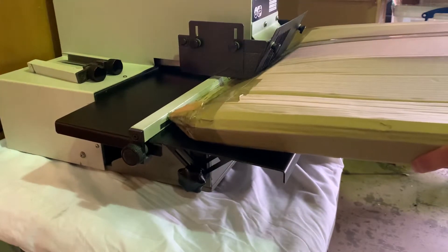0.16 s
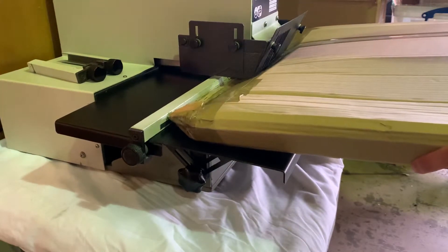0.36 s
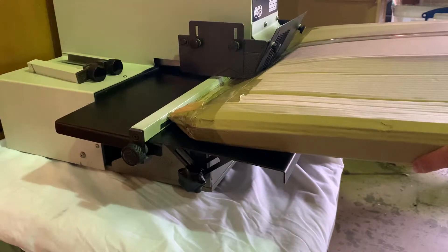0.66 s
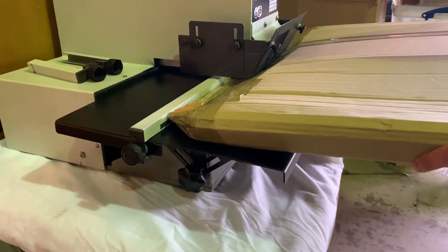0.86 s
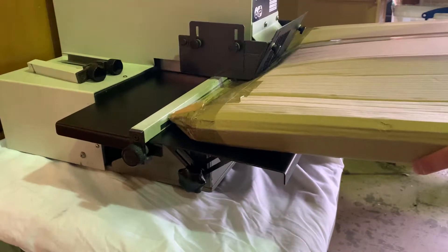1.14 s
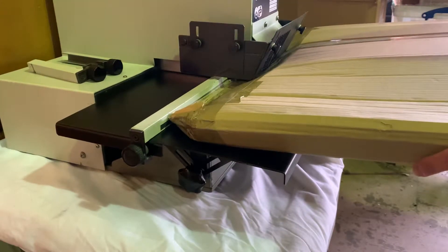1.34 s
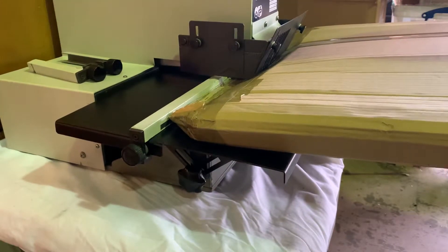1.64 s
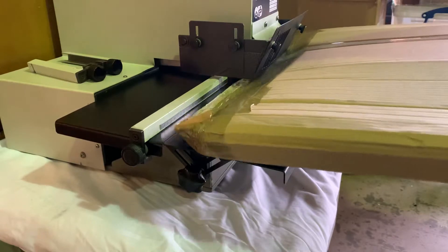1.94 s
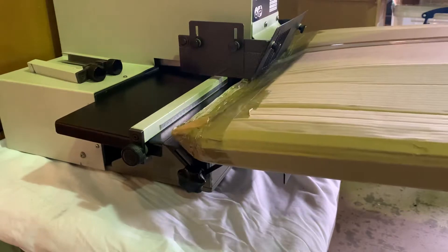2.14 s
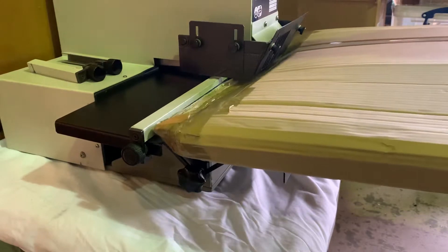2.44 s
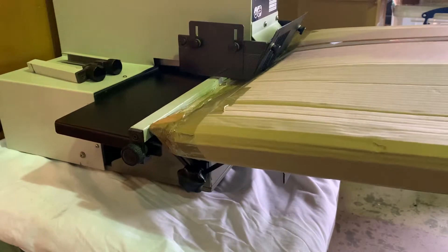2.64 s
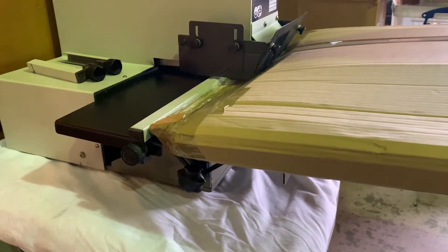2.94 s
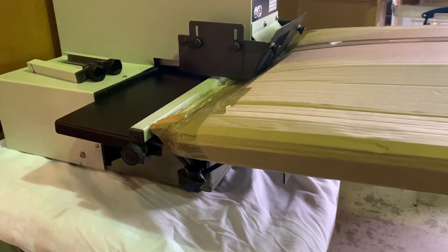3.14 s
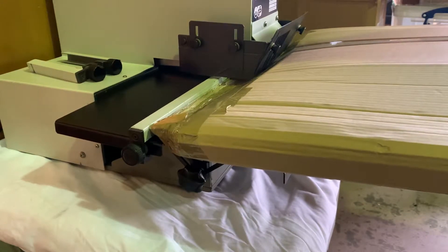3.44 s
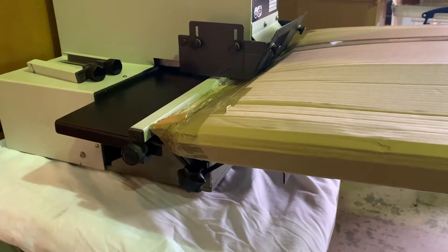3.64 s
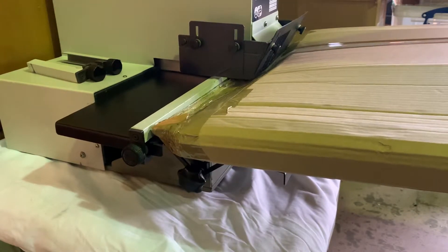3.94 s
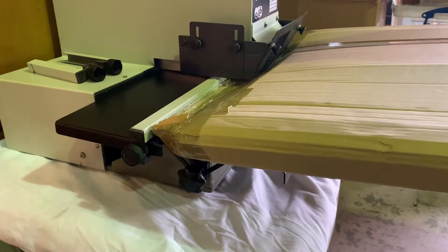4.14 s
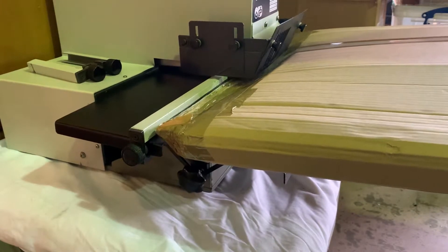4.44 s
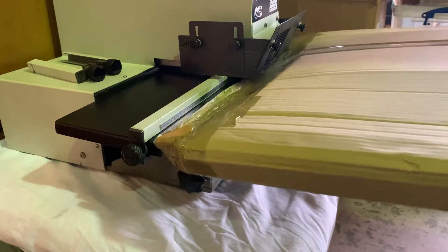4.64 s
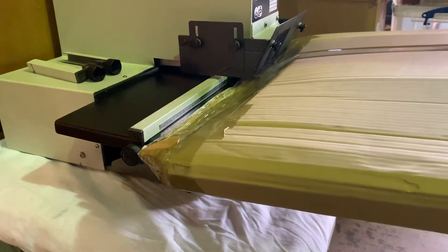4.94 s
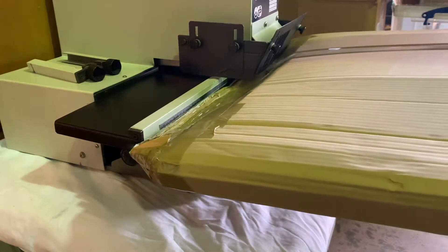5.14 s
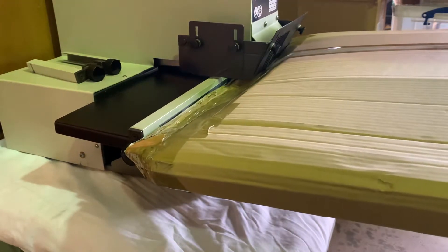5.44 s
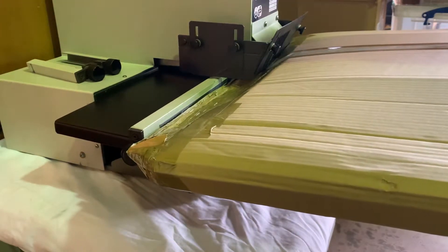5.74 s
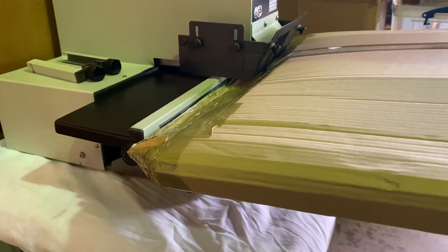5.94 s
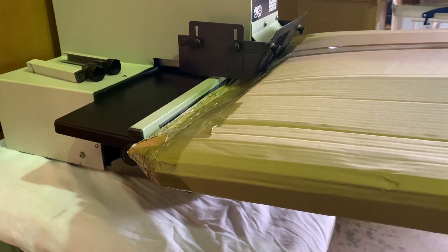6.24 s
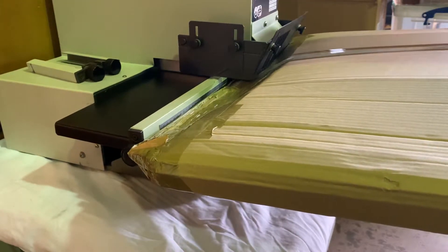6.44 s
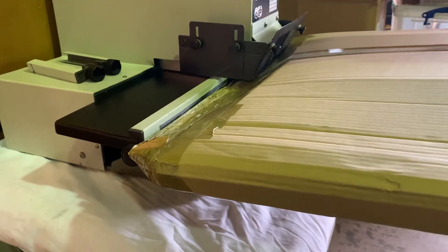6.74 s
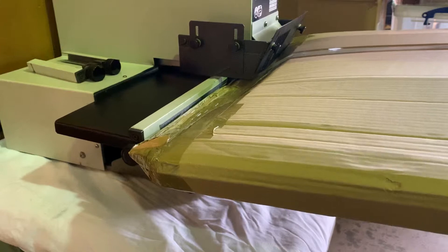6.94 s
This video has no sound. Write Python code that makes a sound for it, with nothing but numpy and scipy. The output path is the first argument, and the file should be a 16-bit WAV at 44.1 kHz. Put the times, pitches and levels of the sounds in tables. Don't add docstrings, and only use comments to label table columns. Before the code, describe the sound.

Close to a stapling machine in a small workshop, a latch clacks with a tiny squeak, then a rapid run of rattling steel blows and hollow thumps lasts under a second. Three such cycles occur about three seconds apart. Between them a wrapped carton scrapes, knocks and ticks over low drone and floor rumble, with a short dull room tail.

```python
import sys
import numpy as np
from scipy import signal
from scipy.fft import rfft, irfft, next_fast_len
from scipy.io import wavfile

SR = 44100
rng = np.random.default_rng(int(sys.argv[2]) if len(sys.argv) > 2 else 0)


def decibels_to_gain(level_db):
    exponent = np.asarray(level_db, float) / 20
    return 10 ** exponent


def file_out(sig):
    cols = np.atleast_2d(sig).T
    lim = np.clip(cols, -1, 1)
    pcm = np.round(lim * 32767).astype(np.int16)
    wavfile.write(sys.argv[1], SR, pcm)


N = 312228

# [hz, width_hz, level_db]
CABINET_MODES = [(172.8, 25, 3.5), (186.8, 13, 5.5), (215.9, 17, 3.5), (289, 23, -5), (328, 11, 0),
                 (351, 68, -6), (425.8, 5.1, -4.5)]
# [start_s, force_db, thump_db, hardness_db, spread (of the run, re usual)]
STAGE_STROKES = [(.766, 1.3, 3, -4, 0.95), (0.846, 1.5, -2, 2.5, 1), (0.9278, 2, -1, -0.5, .99),
                 (1.107, -1.5, 1.5, -0.9, .95), (1.344, -3.5, 3, 6, 0.84), (1.392, 0.5, 2.5, -3, 1.05),
                 (3.541, 0.5, 4, -2.5, 1), (3.624, -3, 2, 8.5, 1), (3.705, 1.5, -4, 0.5, .97),
                 (3.881, -3, 1.5, -0.5, 1.02), (4.122, -4, 5, 8.5, 1.05), (4.17, -1.5, 2.5, -0.5, .9),
                 (6.133, -0.5, -2, -5, 1.1), (6.228, 12, -7, -7.5, 1), (6.305, 1, -1, -1, 1.05),
                 (6.482, -1.64, 3, -1.4, 1.1), (6.725, -5, 7, 10, 1), (6.769, -1, 4.5, -0.5, 1)]
STAGES = 6


def rms_one(x):
    return x / np.sqrt(np.mean(x ** 2) + 1e-20)


def in_time(rows):
    s, *columns = np.transpose(rows)
    return [np.interp(np.arange(N) / SR, s, column) for column in columns]


def grid_hz():
    return np.fft.rfftfreq(2 * next_fast_len((N + SR // 2) // 2), 1 / SR)


def filtered(x, response):
    gain = np.sqrt(np.mean(np.abs(response) ** 2))
    return irfft(rfft(x, 2 * response.shape[-1] - 2) * response / gain)[..., :N]


def modes(table, size=None):
    f = grid_hz() if size is None else np.fft.rfftfreq(size, 1 / SR)
    total = 0
    for k, (hz, width, db) in enumerate(table):
        damping = 1j * f * width
        total = total + (-1) ** k * decibels_to_gain(db) * damping / (hz ** 2 - f ** 2 + damping)
    return total


def colour(spectrum):
    hz, db = np.transpose(spectrum)
    cepstrum = irfft(np.log(decibels_to_gain(np.interp(np.log(grid_hz() + 1), np.log(hz), db))))
    half = len(cepstrum) // 2
    cepstrum[1:half] *= 2
    cepstrum[half + 1:] = 0
    return np.exp(rfft(cepstrum))


def bursts(times, levels_db, decays_s, rise_s, size=N):
    t = np.arange(SR // 5) / SR
    power = np.zeros(size + len(t))
    for s, db, decay, rise in np.broadcast(times, levels_db, decays_s, rise_s):
        at = round(s * SR)
        shape = (1 - np.exp(-t / rise)) * np.exp(-t / max(decay, 2e-4))
        power[at:at + len(t)] += (decibels_to_gain(db) * shape) ** 2
    return np.sqrt(power[:size])


def grains(per_s, spread_db):
    born = rng.random(N) < per_s / SR
    sizes = decibels_to_gain(spread_db * np.minimum(rng.exponential(1, N), 4))
    return rms_one(born * sizes * rng.choice([-1, 1], N))


def drift(rate):
    knots = rng.standard_normal(400)
    return np.interp(np.arange(N) / SR * rate, np.arange(400), knots)


def slowly(shape):
    at = np.arange(0, N + 64, 64)
    return np.interp(np.arange(N), at, shape(at[:, None] / SR))


def swells(times, levels_db, rise_s, decay_s):
    def shape(t):
        age = np.maximum(t - times, 0)
        level = decibels_to_gain(levels_db) * (1 - np.exp(-age / rise_s)) * np.exp(-age / decay_s)
        return np.sum(level ** 2, axis=1)
    return slowly(shape)


def holds(starts, ends, levels_db, rise, fall):
    def shape(t):
        before, after = np.maximum(starts - t, 0), np.maximum(t - ends, 0)
        return np.sum(decibels_to_gain(levels_db - rise * before - fall * after) ** 2, axis=1)
    return slowly(shape)


def contacts():
    # [delay_s, head_db, thump_db (cabinet re head), hard_db (hard parts re head), decay_s]
    latch_run = [(-.027, -42, -2, 1, .025), (-.009, -34, -10, 6, .01), (0, -17, -22, 1, .009),
                 (.021, -16.5, -13, -9, .008)]
    take_up_run = [(0, -32, 8.8, -8.5, 0.011)]
    feed_run = [(-.016, -22.5, -4, -8.5, 0.0083), (0, -17.5, 0, 0.5, 0.0071), (.04, -22, 3.5, -16, 0.013),
                (0.056, -17.5, 0.5, -13, .013), (0.105, -39.5, 14, -15, 0.019)]
    blow_run = [(0, -8.5, 0, 1, 0.011), (.021, -6, -2.5, -3.5, 0.0098), (0.041, -15, -5, -17.5, .024),
                (.066, -25.5, 11, -13.5, 0.0087)]
    clinch_run = [(0, -6.5, 3, -24, 0.0051), (.0095, -15, -21.5, -14.5, 0.023)]
    return_run = [(0, -3, -5.5, -4, 0.009), (.016, -13, -17, -10, 0.016), (0.032, -12, -9, -5, .014),
                  (.062, -16, 3, -22.5, 0.0074)]
    blade_db = [5, -4, -0.5, 0, 0, 0.5]
    # [start_s, head_db, thump_db, hard_db, decay_s]
    strays = [(0.959, -20.5, -7, 0, 0.011), (1.072, -33, 9, -3.5, 0.016), (1.085, -22.5, 7.5, -1.5, 0.0082),
              (4.147, -25, -10, 1.5, 0.0067), (1.358, -25, -10.5, 2, 0.0044), (1.428, -21.5, -10, 5, 0.01),
              (6.338, -22, 3, -17, 0.017), (6.852, -15.5, -10, -35, 0.0058)]
    runs = [latch_run, take_up_run, feed_run, blow_run, clinch_run, return_run]
    rows = [(s, db, thump_db, hard_db, hard_db, decay) for s, db, thump_db, hard_db, decay in strays]
    for k, (s, force_db, push_db, edge_db, spread) in enumerate(STAGE_STROKES):
        stage = k % STAGES
        for delay, db, thump_db, hard_db, decay in runs[stage]:
            bright_db = hard_db + edge_db
            rows.append((s + spread * delay, db + force_db, thump_db + push_db,
                         bright_db + blade_db[stage], bright_db, decay))
    return np.transpose(rows)


def shaking():
    # [time_s, rumble_db (floor), drone_db (motor in the cabinet)]
    rest_curve = [(0, -45, -54.5), (.31, -49, -53), (.71, -48, -56), (2.1, -47, -51), (2.5, -47, -48),
                  (2.72, -48.5, -49), (2.78, -57.5, -50), (3.0, -48, -50.5), (3.39, -45, -56),
                  (4.47, -57, -44), (4.67, -56, -39.5), (4.81, -48, -41), (5.17, -48, -49.5),
                  (5.5, -46, -59.5), (5.84, -45, -58.5), (6.09, -38.5, -64.5), (7.08, -49, -47)]
    # [start_s, sway_db, boom_db, low_panel_db, upper_panel_db]
    jolt_table = [(.85, -44, -45, -30.5, -23.5), (0.933, -24, -22.5, -19, -17),
                  (1.109, -24, -38, -24.5, -17), (1.345, -56, -27, -22.5, -30),
                  (1.40, -23.5, -36, -38, -20.5), (2.31, -48, -41, -52, -44),
                  (3.438, -29.5, -70.5, -67.5, -62), (3.63, -41, -34, -31, -51),
                  (3.701, -24, -24, -21.5, -20), (3.879, -30, -35, -25, -30),
                  (4.125, -31, -24.5, -24.5, -32), (4.18, -22, -39, -39, -20), (5.859, -35, -72, -54, -66),
                  (6.161, -50, -30.5, -53, -28), (6.271, -19, -33, -23.5, -20),
                  (6.49, -34, -28.5, -31.5, -35), (6.73, -23, -40, -23, -40), (6.78, -47, -22.5, -31, -26)]
    # [rise_s, decay_s, after_ring_db, after_ring_decay_s]
    answers = [(0.06, 0.11, -11.5, 0.29), (0.029, 0.12, -22, 0.18), (0.0031, 0.12, -3, 0.33),
               (0.027, 0.1, -18.5, 0.4)]
    rumble_db, drone_db = in_time(rest_curve)
    s, *jolts = np.transpose(jolt_table)
    rests = [rumble_db, rumble_db - 13.5, rumble_db - 20.5, drone_db]
    levels = []
    for rest, db, (rise, decay, late_db, late) in zip(rests, jolts, answers):
        fast = swells(s, db, rise, decay)
        slow = swells(s, db + late_db, rise, late)
        levels.append(10 * np.log10(decibels_to_gain(rest) ** 2 + fast + slow))
    return levels


def hissing():
    hiss_rest_db = [-65, -92, -90.5]
    # [start_s, length_s, rub_db, film_db (re rub), air_db (re rub)]
    slides = [(-.05, 0.091, -66, -0.5, 5.5), (1.613, 0.31, -52, 4.5, -1.5), (1.708, 0.043, -67, 26, -14.5),
              (1.955, 0.036, -56.5, -7, 5), (2.248, 0.15, -60, -0.5, 6.5), (2.451, 0.11, -64.5, -1, 9),
              (2.792, 0.062, -67.5, -5.5, 4), (3.037, 0.071, -75.5, 0.5, 8), (4.376, 0.087, -58, -2, 1),
              (4.553, 0.13, -55, -1.5, -7.5), (4.67, 0.11, -58.5, 1.5, 4), (4.851, 0.21, -67.5, 1, 7.5),
              (5.126, 0.1, -62.5, -1, 6.5), (5.263, 0.04, -76.5, 2, 6), (5.894, 0.016, -74.5, -3, -7.5),
              (7.036, .1, -53, 5, 1)]
    drive_db, drive_fall = [-41.5, -52.5, -55.5], [34, 35, 110]
    drive_rise, overrun_s = 700, 0.12
    cycles = np.array(STAGE_STROKES)[:, 0].reshape(-1, STAGES)
    start, length, db, film_db, air_db = np.transpose(slides)
    s, head_db = contacts()[:2]
    drag = swells(s, head_db - 35, rise_s=0.035, decay_s=0.089)
    levels = []
    for rest, rel_db, drive, fall, extra in zip(hiss_rest_db, [air_db, 0, film_db], drive_db, drive_fall,
                                                [0, drag, 0]):
        sliding = holds(start, start + length, db + rel_db, rise=220, fall=230)
        running = holds(cycles[:, 0], cycles[:, -1] + overrun_s, drive, drive_rise, fall)
        levels.append(10 * np.log10(decibels_to_gain(rest) ** 2 + extra + sliding + running))
    return levels


def patchy(x):
    edges_hz = [1000, 2400, 3600, 5200, 7500, 11000, 17000]
    total = 0
    for k, edges in enumerate(zip(edges_hz, edges_hz[1:])):
        band = signal.butter(2, edges, "band", fs=SR, output="sos")
        flicker = decibels_to_gain(2.5 * drift(14))
        total = total + (-1) ** k * flicker * signal.sosfilt(band, x)
    return total


def background():
    # [hz, width_hz, level_db]
    stand = [(46.8, 9.1, -2.5), (69, 17, -4), (76.2, 7.7, -2), (130, 38, -19.5)]
    # [hz, width_hz, level_db]
    hum = [(772, 8, -73)]
    # [hz, width_hz, steady_db]
    panel_modes = [(93.5, 12, -2), (180, 17, 1)]
    # [hz, level_db (per Hz)]
    air_spectrum = [(240, -15.5), (400, -5.5), (791, -9), (992, -10.5), (1070, -11.5), (2600, -27.5),
                    (3380, -68), (5720, -120)]
    rub_spectrum = [(1200, -13.5), (2000, 2.5), (3000, -5), (3750, 0.5), (4500, 0), (6200, -20),
                    (8000, -34.5)]
    film_spectrum = [(4800, -27.5), (6200, -1.5), (10200, 3.5), (13500, 0), (15500, 2.5), (16300, -30)]
    # [hz, width_hz, level_db]
    flutes = [(2250, 170, -4), (3825, 350, 8.5)]
    sway_db, boom_db, *panels_db = shaking()
    air_db, rub_db, film_db = hissing()
    white, t = rng.standard_normal((8, N)), np.arange(N) / SR
    low = decibels_to_gain(sway_db) * filtered(white[0], modes(stand))
    low += decibels_to_gain(boom_db + 0.68 * drift(2.6)) * filtered(white[1], modes(CABINET_MODES[2:]))
    for hz, width, db in hum:
        low += decibels_to_gain(db) * filtered(white[2], modes([(hz, width, 0)]))
    for db, (hz, width, steady_db) in zip(panels_db, panel_modes):
        wander = np.cumsum(2.68 * drift(5.7)) / SR
        steady = decibels_to_gain(steady_db) * np.sin(2 * np.pi * (hz * t + wander))
        low += decibels_to_gain(db) * (steady + 0.5 * filtered(white[7], modes([(hz, width, 0)])))
    apart = np.array([[1], [-1]])
    air_noise = filtered(white[3] + 0.46 * apart * white[4], colour(air_spectrum))
    air = decibels_to_gain(air_db + 0.88 * drift(8.9)) * air_noise
    friction = 0.3 * white[5] + 0.5 * grains(1500, spread_db=1.5) + 0.87 * apart * white[6]
    board = 0.96 * filtered(friction, colour(rub_spectrum)) + 0.36 * filtered(friction, modes(flutes))
    rub = decibels_to_gain(rub_db + 3.0 + 1.8 * drift(20)) * board
    film = decibels_to_gain(film_db + 5.5 + 2.1 * drift(21)) * filtered(friction, colour(film_spectrum))
    wide_low = low * decibels_to_gain([[-.8], [.8]]) + decibels_to_gain(-19.5) * apart * np.roll(low, 900)
    return wide_low + air + patchy(rub + film)


def film_ticks():
    # [start_s, level_db, centre_hz]
    tick_table = [(.53, -59.5, 2950), (2.0017, -31.5, 9500), (2.3059, -29, 10430), (2.309, -24.5, 10100),
                  (2.317, -32, 9000), (2.388, -35.5, 10500), (2.396, -40, 9000), (2.457, -38, 7900),
                  (2.4635, -33.5, 9780), (2.7842, -19, 12510), (2.8281, -36, 6500), (2.8467, -15.5, 11800),
                  (2.9507, -57, 3990), (4.868, -40.5, 6330), (4.9846, -48, 3850), (5.016, -39.5, 6340),
                  (5.18, -29, 10400), (5.1966, -41.5, 3600), (5.238, -32, 10650), (5.448, -57, 5030),
                  (2.482, -47, 8500), (5.481, -59, 3200), (5.6755, -54, 4470), (5.521, -47, 4900),
                  (5.6361, -44, 10060), (5.6808, -51, 6260), (5.833, -46, 13500), (5.878, -29.5, 10900)]
    white, span = rng.standard_normal(N), SR // 8
    ticks = np.zeros(N)
    for s, db, hz in tick_table:
        at = slice(round(s * SR), round(s * SR) + span)
        snap = white[at] * bursts([0], db - 26, 0.00786, rise_s=0.0023, size=span)
        snap[0] = decibels_to_gain(db + 14.5) * np.sign(white[at][0])
        peak = signal.iirpeak(min(hz, 15000), 1.5, SR)
        rung = signal.lfilter(*peak, snap) + decibels_to_gain(-20.5) * snap
        ticks[at] += np.sqrt(14000 / hz) * signal.lfilter(*peak, rung)
    return ticks


def clutch_latch():
    # [start_s, level_db]
    latches = [
        (0.765, -7),
        (3.539, -10.5),
        (6.131, -14),
    ]
    # [hz, width_hz, level_db]
    latch_modes = [(550, 70, 1), (1480, 130, -24), (2150, 90, -14.5), (2660, 120, -8), (3320, 370, -8),
                   (4050, 230, -7.5)]
    s, db = np.transpose(latches)
    force = rng.standard_normal(N) * bursts(s, db, 0.0013, rise_s=0.0007)
    return filtered(force, modes(latch_modes))


def clutch_squeak():
    # [centre_s, level_db, spread_s]
    squeaks = [
        (0.82, -17, 0.011),
        (3.573, -16.5, 0.0059),
        (6.157, -15, 0.0053),
        (6.146, -16, 0.00173),
    ]
    t = np.arange(N) / SR
    swell = sum(decibels_to_gain(db) * np.exp(-((t - s) / spread) ** 2 / 2) for s, db, spread in squeaks)
    phase = 2 * np.pi * 1043 * t + 0.39 * drift(33)
    early_swell = np.roll(swell, -round(.006 * SR))
    return swell * np.sin(phase) + decibels_to_gain(-10.5) * early_swell * np.sin(1.9 * phase)


def sheets(s, levels_db, decays_s, rise_s):
    # [hz, level_db (per Hz)]
    rattle_spectrum = [(2240, -20), (3800, -3), (5270, -11.5), (6210, -5.5), (10500, -2.5), (12000, -11),
                       (15400, -9.5), (16800, -29)]
    sheet_count, ring_s, direct = 2, .008, .6
    t, tone = np.arange(SR // 20) / SR, colour(rattle_spectrum)
    out, total = 0, 0
    grit, which = grains(6500, spread_db=6.5), np.arange(len(s)) % sheet_count
    for k in range(sheet_count):
        own = which == k
        ring = rng.standard_normal(len(t)) * np.exp(-t / ring_s)
        crowd = rfft(ring / np.sqrt(np.sum(ring ** 2)), 2 * len(tone) - 2)
        force = grit * bursts(s[own], levels_db[own], decays_s[own], rise_s[own])
        out = out + filtered(force, tone * (direct + crowd))
        total = total + force
    return out, total


def mechanism():
    # [hz, width_hz, level_db]
    head_modes = [(488, 63, 3), (610, 48, 3.5), (768, 52, 1), (860, 22, -4.5), (1064, 110, 1.5),
                  (1144.4, 38, 1)]
    table_modes = [(268, 5, -2), (358, 5, 0), (518, 4, 0), (578, 5, -3)]
    driver_modes = [(1370, 11, -14.5), (1920, 37, -1.5), (2130, 38, 4), (2640, 36, -6.5), (3066, 330, 6),
                    (3740, 280, -1)]
    pin_modes = [(4540, 31, 6), (5740, 70, -1), (6394, 30, 11), (7380, 60, -1)]
    # [hz, level_db (per Hz)]
    clatter = [(240, -42), (400, -4), (695, -6.5), (1050, 10.5), (1500, -9.5), (1950, -64), (3300, -120)]
    scratch = [(820, -30), (1400, -6.5), (2260, -1.5), (2460, -5), (4200, -22), (5460, -32), (9240, -120)]
    s, head_db, thump_db, driver_db, bright_db, decay = contacts()
    slow = decibels_to_gain(-.45 * (head_db + 9.5))
    chatter = 0.88 * grains(1600, spread_db=5.5) + 0.64 * rng.standard_normal(N)
    first = bursts(s, head_db - 0.5, 0.0025, 0.0016 * slow)
    force = chatter * (first + bursts(s, head_db, decay, 0.0032 * slow))
    head = decibels_to_gain(-2.0) * filtered(force, modes(head_modes)) + decibels_to_gain(-5.5) * filtered(force, colour(clatter))
    table = decibels_to_gain(-13.5) * filtered(force, modes(table_modes))
    force = chatter * bursts(s, head_db + driver_db - 4.5, 1.04 * decay, 0.0029 * slow)
    driver = decibels_to_gain(-1.0) * filtered(force, modes(driver_modes)) + decibels_to_gain(3) * filtered(force, colour(scratch))
    rattle, force = sheets(s, head_db + bright_db - 1.5, 1.07 * decay, 0.00041 * slow)
    pins = decibels_to_gain(-13) * filtered(force, modes(pin_modes))
    force = rng.standard_normal(N) * bursts(s, head_db + thump_db + 2.5, 1.37 * decay, 0.0063)
    return head + table + driver + rattle + pins + filtered(force, modes(CABINET_MODES))


def impacts():
    # [hz, width_hz, level_db]
    latch_ring = [(517, 76, -5.5), (1490, 77, -13.5), (2200, 72, -14.5), (2770, 470, -3), (3220, 80, -14),
                  (3610, 65, -12.5), (4040, 210, -0.5), (6600, 200, -15)]
    feed_ring = [(2180, 45, -4.5), (3600, 60, -5.5), (4560, 50, -7), (5300, 38, -11), (5900, 100, -0.5),
                 (7440, 40, -3), (7500, 60, -6), (9790, 80, -11), (10400, 60, -14)]
    blow_ring = [(326, 80, 5), (540, 110, 2.5), (1050, 230, -1), (1860, 50, -1), (2305, 120, -2),
                 (3063, 60, -5), (4535, 40, -11), (6870, 100, -10.5), (7550, 60, -10.5), (9380, 100, -9.5)]
    clinch_ring = [(352, 100, -5.5), (776, 70, 3), (1120, 86, -1), (2100, 99, -12), (3800, 90, -20.5)]
    return_ring = [(215, 30, 5), (500, 49, -0.5), (1048, 30, -2), (1890, 65, -4.5), (2210, 60, -6),
                   (3210, 77, -4.5), (4300, 40, -2), (6460, 20, -10), (7300, 40, -13), (10500, 80, -12.5)]
    # [stage (0 latch .. 5 return), delay_s, level_db, contact_s]
    blows = [(0, -.0005, 2, 0.00018), (0, .0015, 2.5, 0.00009), (2, 0.006, -4, 0.000038),
             (2, .0035, -12, 0.00007), (2, 0.064, -5, 0.00016), (3, .001, -2.5, 0.000043),
             (3, .006, -2.5, 0.000085), (3, 0.017, -2.5, 0.000074), (3, .0235, 1.5, 0.0005),
             (3, .038, 10, 0.00082), (4, .001, 1.5, 0.00025), (4, .012, 3, 0.00017), (4, 0.021, -7, .0001),
             (5, .002, 0, 0.000054), (5, .0065, 8, 0.00011), (5, .016, 3.5, 0.00048),
             (5, .036, 1.5, 0.00021)]
    rings = [latch_ring, None, feed_ring, blow_ring, clinch_ring, return_ring]
    out, t = np.zeros(N + SR), np.arange(8192) / SR
    for stage, delay, db, contact in blows:
        stage = round(stage)
        push = t * np.exp(-t / max(contact, 2e-5))
        push = push / np.sqrt(np.sum(push ** 2))
        response = modes(rings[stage], size=len(t))
        blow = irfft(rfft(push) * response / np.sqrt(np.mean(np.abs(response) ** 2)))
        for s, force_db, _, _, spread in STAGE_STROKES[stage::STAGES]:
            at = round((s + spread * delay) * SR)
            out[at:at + len(t)] += decibels_to_gain(db + force_db) * blow
    return out[:N]


def carton_knocks():
    # [start_s, body_db, slap_db (re body), slap_hz, decay_s]
    knock_table = [(2.305, -24, -16, 790, 0.031), (2.316, -30, -14.5, 816, 0.0086),
                   (2.653, -38, -24, 577, 0.008), (5.125, -49, 16.5, 1900, 0.0032),
                   (5.186, -30, -16, 567, 0.014), (5.519, -39, 7, 1270, 0.0038),
                   (5.681, -49, 1, 786, 0.0058), (5.875, -52, -4.5, 584, 0.013),
                   (1.826, -29.5, 1.5, 1030, 0.016),
        (5.398, -38, -10, 597, 0.011),
    ]
    # [hz, width_hz, level_db]
    box_modes = [(190.4, 14.7, 3.5), (290, 48, -0.5), (321.6, 8.5, -1), (380, 61, -6.5), (467, 240, -9)]
    white, span = rng.standard_normal((2, N)), SR // 8
    knocks = np.array(knock_table)
    force = white[0] * bursts(knocks[:, 0], knocks[:, 1] + 0.61, knocks[:, 4], rise_s=0.0014)
    out = filtered(force, modes(box_modes))
    for s, db, slap_db, hz, decay in knocks:
        at = slice(round(s * SR), round(s * SR) + span)
        slap = white[1, at] * bursts([0], db + slap_db, 0.5 * decay, rise_s=0.00027, size=span)
        dull = signal.lfilter([.1], [1, -1.4, .49], slap)
        out[at] += np.sqrt(SR / hz / 1.5) * signal.lfilter(*signal.iirpeak(hz, 1.3, SR), dull)
    return signal.lfilter(*signal.butter(2, 2600, fs=SR), out)


def nearby(x):
    span_s, from_hz = .011, 1500
    lags = (rng.uniform(0.05, 1, size=14) * span_s * SR).astype(int) + 1
    high = signal.lfilter(*signal.butter(2, from_hz, "high", fs=SR), x)
    echoes = decibels_to_gain(-12) * sum((-1) ** k * np.roll(high, lag) for k, lag in enumerate(lags))
    return np.array([x + echoes, x - echoes])


def workshop(x):
    t60_s, cut_hz = 0.32, 5500
    t = np.arange(SR) / SR
    common, own = rng.standard_normal(SR), rng.standard_normal((2, SR))
    own = signal.lfilter(*signal.butter(2, 400, "high", fs=SR), own)
    tail = signal.lfilter(*signal.butter(1, cut_hz, fs=SR), common + 1.6 * own)
    tail = tail * decibels_to_gain(-60 * t / t60_s) * np.clip(t / 0.0031, 0, 1)
    return signal.fftconvolve(x[None], tail / np.sqrt(np.sum(tail ** 2) / 2), axes=1)[:, :N]


def ports(x):
    lag_s, flip_hz, flip_slope = .000337, 1350, 1.5
    alike_from_hz = 6800
    f, apart = grid_hz(), np.array([[-1], [1]])
    side = signal.sosfilt(signal.butter(3, alike_from_hz, fs=SR, output="sos"), x[1] - x[0]) / 2
    flip = np.pi * (1 - np.exp(-(f / flip_hz) ** flip_slope))
    turn = 2 * np.pi * f * lag_s - flip
    return filtered(x.mean(axis=0) + apart * side, np.exp(.5j * turn * apart))


def scene():
    ticks, squeak = film_ticks(), clutch_squeak()
    hits = clutch_latch() + mechanism() + impacts() + carton_knocks()
    room = decibels_to_gain(-13.5) * workshop(hits + ticks + 0.37 * squeak)
    far = background() + nearby(hits + squeak) + room
    return ports(far) + decibels_to_gain(1.5) * np.array([np.roll(ticks, 1), ticks])


def low_pass(x):
    return signal.sosfilt(signal.butter(12, 16710, fs=SR, output="sos"), x)


def record(dry):
    x = 0.94 * np.tanh(dry / 1.106)
    x = signal.sosfilt(signal.butter(2, 36, "high", fs=SR, output="sos"), x)
    x = signal.sosfilt(signal.butter(10, 15400, fs=SR, output="sos"), x)
    return low_pass(x)


dry = scene()
out = record(dry)
file_out(out)
```